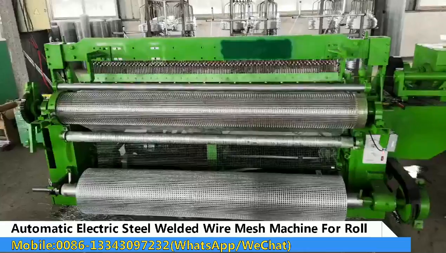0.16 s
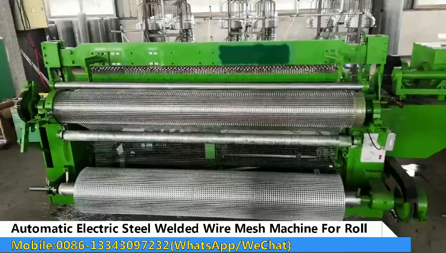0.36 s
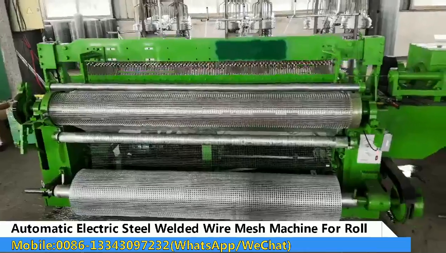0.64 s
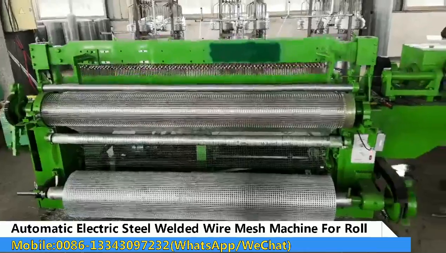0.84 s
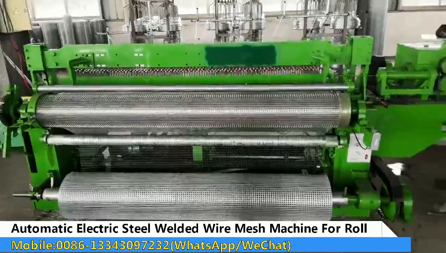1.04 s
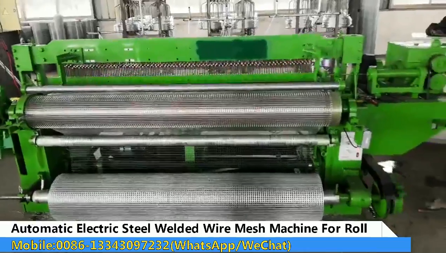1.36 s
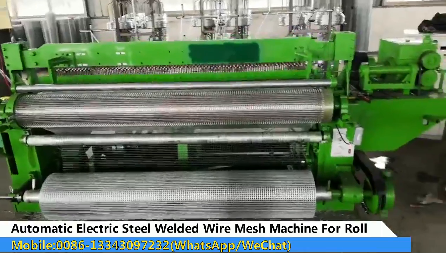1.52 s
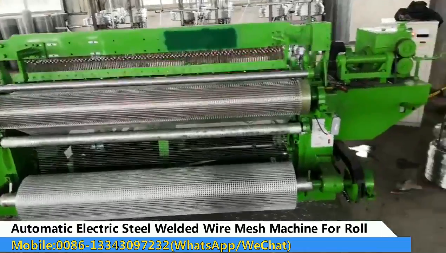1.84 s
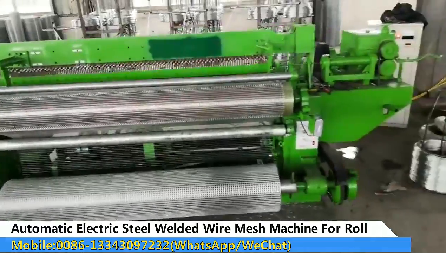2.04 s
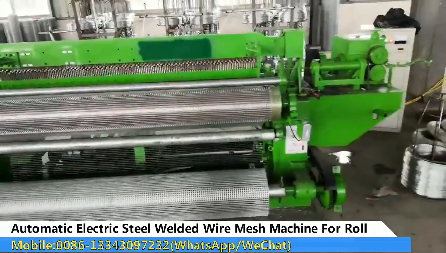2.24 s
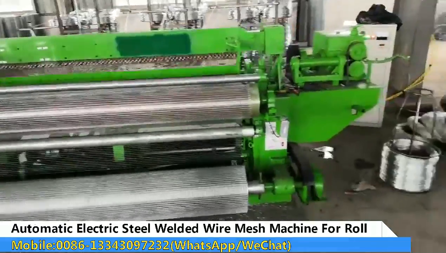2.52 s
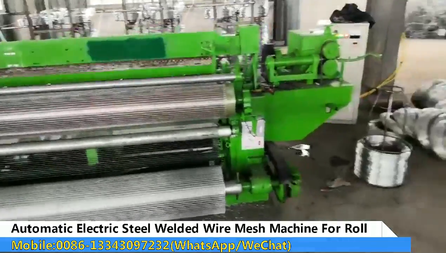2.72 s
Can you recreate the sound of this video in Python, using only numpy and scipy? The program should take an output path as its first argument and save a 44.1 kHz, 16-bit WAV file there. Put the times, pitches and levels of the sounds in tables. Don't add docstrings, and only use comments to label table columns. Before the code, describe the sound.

Heavy industrial machine cycling rhythmically, metal clacks, snaps and rattling rollers over a low factory roar

```python
import sys
import numpy as np
from scipy import signal
from scipy.io import wavfile

SR = 44100
rng = np.random.default_rng(int(sys.argv[2]) if len(sys.argv) > 2 else 0)


def invert_db(x):
    u = np.asarray(x, float) / 20
    return 10 ** u


def log_audio(samples):
    frames = np.atleast_2d(samples).T
    limited = np.clip(frames, -1, 1)
    pcm = np.round(limited * 32767).astype(np.int16)
    wavfile.write(sys.argv[1], SR, pcm)


N = 127008
STROKE_S = 0.568
SIDES = np.array([[0.5], [-0.5]])

# (time [s], level [dB])
DRIVE_EFFORT = [(.26, -19), (.6, -19), (.8, -26), (1.1, -22.5), (1.35, -25.5), (1.6, -22.5), (1.9, -24.5),
                (2.2, -23.5), (2.45, -23), (2.88, -23.5)]
# (time [s], level [dB])
DRONE_LEVEL = [(.26, -25), (.45, -29.5), (.62, -26), (.75, -33.5), (1.05, -28.5), (1.3, -31.5),
               (1.6, -33.5), (1.74, -30.5), (1.85, -31.5), (2.2, -31), (2.32, -32.5), (2.45, -34.5),
               (2.88, -31)]

# (time [s], peak [dB])
FEED_TICKS = [
    (0.3084, -26.5),
    (0.883, -24),
    (1.446, -29),
    (2.0108, -26.5),
    (2.5855, -25.5),
]
# (time [s], peak [dB], left-right [dB])
BEAM_CLACKS = [
    (0.3474, -11.5, -3.5),
    (0.9106, -16, 4.5),
    (1.484, -14.5, 1.5),
    (2.055, -12, 5),
    (2.619, -13.5, 3),
]
# (time [s], peak [dB])
LATCH_SNAPS = [
    (0.4404, -16.5),
    (1.0073, -20),
    (1.5763, -18.5),
    (2.1434, -19),
    (2.7126, -21.5),
]
# (time [s], peak [dB], left-right [dB])
PIN_PINGS = [
    (0.54, -17, 14),
    (1.107, -20, 13),
    (1.6752, -19, -0.5),
    (2.242, -23.5, -12),
    (2.816, -22, -10),
]
# (time [s], peak [dB])
RETURN_THUDS = [
    (0.6044, -32),
    (1.1744, -27),
    (1.7394, -23),
    (2.3046, -22),
    (2.868, -25),
]
# (time [s], peak [dB])
ELECTRODES = [(0.3102, -26), (0.322, -25), (0.34, -23), (0.3491, -16.5), (0.3601, -17), (0.365, -25),
              (0.3702, -32), (0.3746, -27), (0.8812, -27), (0.8879, -31), (0.8931, -30), (0.9, -27),
              (0.9082, -33), (0.9223, -23), (0.9377, -20), (0.942, -36), (1.4488, -34), (1.4748, -31),
              (1.4856, -23), (1.4895, -17), (1.4996, -18.5), (1.505, -22), (1.5121, -24), (1.5182, -32),
              (2.014, -25), (2.046, -21), (2.053, -25), (2.058, -20), (2.063, -23), (2.0698, -29),
              (2.076, -27), (2.0841, -27), (2.5872, -34), (2.6164, -25), (2.6224, -32), (2.6327, -20),
              (2.639, -23), (2.6444, -33), (2.6512, -30), (2.6562, -36)]
# (time [s], peak [dB])
SPITS = [
    (1.556, -39),
    (1.600, -48),
    (1.680, -44),
    (2.013, -39),
    (2.695, -38),
]
# (time [s], level [dB], pitch [Hz])
FRAME_KNOCKS = [(0.287, -33, 205), (0.289, -25, 1098), (0.327, -28, 153), (0.329, -26.5, 354),
                (0.344, -20.5, 1100), (0.352, -23, 2250), (0.362, -24, 2984), (0.367, -39, 179),
                (0.369, -28.5, 357), (0.429, -34, 1173), (0.446, -32, 2150), (0.454, -30.5, 230),
                (0.481, -25, 362), (0.511, -25, 1238), (0.544, -26, 1195), (0.581, -26, 1215),
                (0.589, -26, 1060), (0.596, -20.5, 352), (0.631, -22, 2420), (0.631, -26, 1860),
                (0.686, -27, 887), (0.706, -22, 2510), (0.913, -27, 2640), (0.915, -24, 1017),
                (0.94, -25, 1266), (1.05, -30, 347), (1.202, -26, 2440), (1.302, -29, 1900),
                (1.394, -23, 2465), (1.432, -24.5, 1098), (1.487, -24, 2250), (1.487, -23, 2775),
                (1.494, -25, 1173), (1.734, -22, 342), (1.823, -27, 895), (1.906, -24.5, 2440),
                (1.958, -24.5, 1827), (2.018, -21, 2562), (2.06, -22, 2760), (2.063, -34, 2993),
                (2.295, -28, 348), (2.317, -28, 215), (2.41, -23.5, 1756), (2.632, -25.5, 1173),
                (2.669, -28, 348), (2.766, -31.5, 326), (2.868, -25, 936), (2.871, -28.5, 360)]
# (time [s], level [dB], pitch [Hz])
SHORT_TAPS = [(0.541, -38, 6400), (1.109, -41, 7500), (1.252, -31, 2480), (1.253, -21, 1880),
              (1.678, -28, 6190), (1.759, -28, 1780), (2.244, -30.5, 6260), (2.34, -21.5, 2010),
              (2.472, -32, 1770), (2.529, -24, 2490), (2.818, -29, 6140), (2.279, -37, 1160),
              (1.3, -23.5, 1910), (2.014, -43, 11400), (2.014, -42, 9400)]
# (time [s], level [dB], pitch [Hz])
PAWL_CHIMES = [
    (0.905, -34, 8080),
    (1.472, -39, 8000),
    (2.036, -41, 8060),
]

# (pitch [Hz], width [Hz], level [dB])
BEAM_MODES = [(2220, 450, -4), (2780, 34, 2), (2975, 90, -0.5), (3484, 93, 1), (3690, 180, -8),
              (5205, 100, -5), (5815, 60, -3.5), (6084, 60, -7), (8020, 600, -13), (8900, 810, -11.5)]
# (pitch [Hz], width [Hz], level [dB])
PAWL_MODES = [(5760, 94, -8), (8165, 79, -13), (2560, 450, 1)]
# (pitch [Hz], width [Hz], level [dB])
LATCH_MODES = [(1240, 220, -11), (2020, 440, -12), (4450, 720, -21), (5510, 130, -1), (6080, 320, -5.5),
               (9900, 860, -10.5)]
# (pitch [Hz], width [Hz], level [dB])
PIN_MODES = [(6110, 370, -7), (2884, 110, -5), (7620, 390, -17)]
# (pitch [Hz], width [Hz], level [dB])
STOP_MODES = [(4300, 120, -3.5), (5350, 300, -9), (5600, 530, -3.5)]
# (pitch [Hz], width [Hz], level [dB])
FRAME_MODES = [(899, 31, -5.5), (1011.5, 16, -6), (1111.4, 31, -6), (1173, 31, -2), (1269, 28, -3)]
# (pitch [Hz], width [Hz], level [dB])
ROLLER_MODES = [(1770, 66, 4.5), (1883, 74, 1.5), (2034, 72, 0.5), (2360, 40, -1.5), (2453, 50, 2),
                (2473, 175, 1), (2700, 130, -3.5), (4170, 240, -13)]
# (pitch [Hz], width [Hz], level [dB])
GEARBOX_MODES = [(111.3, 4.2, -4), (152.4, 15, -7), (167.3, 8.6, 4.5), (220.3, 46, -1.5), (274, 11, -13.5),
                 (341.8, 20.7, 2.5), (432.6, 7.7, -0.5)]

# (pitch [Hz], level [dB per Hz])
ROAR_TONE = [(15, -51), (25, -21.5), (340, -3), (546, -12), (894, -4.5), (1490, -9.5), (2500, -6.5),
             (3400, -18), (4420, -36.5), (7480, -120)]
# (pitch [Hz], level [dB per Hz])
HISS_TONE = [(2700, -16), (3300, -1.5), (4700, -5), (6200, -5.5), (7000, -8.5), (8900, -14), (9700, -24.5),
             (15700, -36)]
# (pitch [Hz], level [dB per Hz])
CRACK_TONE = [(590, -39), (1000, -59), (1620, -35), (1930, 11), (3210, 8.5), (4430, 1.5), (15800, -16)]
# (pitch [Hz], level [dB per Hz])
CRUNCH_TONE = [(1000, 0), (2800, -3), (4800, -3), (6050, -13), (7000, -9.5), (11500, -29.5), (12800, -51),
               (15800, -54)]
# (pitch [Hz], level [dB per Hz])
SIZZLE_TONE = [(8000, -16), (11500, -4), (14000, 0), (15800, -4)]

# (pitch [Hz], likeness [0 to 1])
LIKENESS = [(60, .999), (130, 1), (340, 0.94), (520, 0.4), (1000, 0.45), (3000, 0.26), (15000, 0.5)]
# (pitch [Hz], left-right [dB])
LEFT_LEAN = [(300, -0.5), (700, 0.5), (1300, 2.5), (2400, 6), (4400, -5), (8100, 1.5), (15000, 7)]
# (pitch [Hz], delay [samples])
RIGHT_LAG = [(300, 3), (600, 17), (950, 1), (3000, 5), (5800, 14), (15000, 21)]


def unit(x):
    return x / np.sqrt(np.mean(x ** 2) + 1e-20)


def at(points, x, warp=np.log):
    p = np.array(points, float)
    return np.interp(warp(x), warp(p[:, 0]), p[:, 1])


def in_time(rows):
    return at(rows, np.arange(N) / SR, np.asarray)


def drift(rate):
    r = np.exp(-80 * np.pi * rate / SR)
    chance = rng.standard_normal(N // 40 + 2002)
    slow = signal.lfilter([1], [1, -2 * r, r * r], chance)[2000:]
    return np.interp(np.arange(N) / 40, np.arange(len(slow)), unit(slow))


def swell(peak_s, height_db):
    return height_db * np.cos(2 * np.pi * (np.arange(N) / SR - peak_s) / STROKE_S)


def ports(mid, side, hz):
    alike = np.clip(at(LIKENESS, hz), 0, 0.999)
    shared, differing = np.sqrt(1 + alike) * mid, np.sqrt(1 - alike) * side
    left, right = (shared + differing * [[1], [-1]]) / np.sqrt(2)
    return invert_db(at(LEFT_LEAN, hz) * SIDES) * [left, np.roll(right, int(at(RIGHT_LAG, hz)))]


def resonate(x, hz, width_hz):
    for wide in (1, 5):
        r = np.exp(-np.pi * wide * max(width_hz, 2) / SR)
        gain = np.sqrt((1 - r * r) / 2) if wide == 1 else (1 - r * r) / 2
        poles = [1, -2 * r * np.cos(2 * np.pi * hz / SR), r * r]
        x = signal.lfilter(gain * np.array([1, 0, -1]), poles, x + 1e-18)
    return x


def coloured(tone, patchy_db=0, count=2.5):
    low_hz, top_hz = max(tone[0][0], 20), min(tone[-1][0] * 1.1, 18000)
    edges = np.geomspace(low_hz, top_hz, int(count * np.log2(top_hz / low_hz)))
    out, white = 0, rng.standard_normal((2, 2, N))
    for k, (low, high) in enumerate(zip(edges, edges[1:])):
        hz = np.sqrt(low * high)
        band_filter = signal.butter(3, [low, high], "band", fs=SR, output="sos")
        band = signal.sosfilt(band_filter, white[k % 2])
        level_db = at(tone, hz) + patchy_db * drift(9.7)
        out = out + invert_db(level_db) * ports(*band, hz)
    return unit(out)


def hall(x):
    ring_out_s, wall_hz = 0.83, 4260
    out, dull = np.zeros((2, N)), np.exp(-2 * np.pi * wall_hz / SR)
    for k, lag in enumerate((rng.uniform(0.027, 0.07, 12) * SR).astype(int)):
        loop, gain, state = x.copy(), invert_db(-60 * lag / SR / ring_out_s), [0.]
        for i in range(lag, N, lag):
            back, state = signal.lfilter([gain * (1 - dull)], [1, -dull], loop[i - lag:i], zi=state)
            loop[i:i + lag] += back[:N - i]
        out[k % 2] += (loop - x) * (-1) ** (k // 2)
    return out


def roar_and_hiss(load):
    swing = load - load.mean()
    roar = invert_db(-24 + 0.61 * swing) * coloured(ROAR_TONE, patchy_db=2.0, count=3)
    hiss_db = -35 + 0.55 * swing + swell(0.4, 1.5)
    return roar + invert_db(hiss_db) * coloured(HISS_TONE, patchy_db=-1.3, count=6)


def body(modes, hits_per_s, spread_db, flicker_db, flicker_rate):
    strength = invert_db(spread_db * np.minimum(rng.exponential(1, N), 3))
    hits = (rng.random(N) < hits_per_s / SR) * strength
    out, white = 0, rng.standard_normal((2, N)) * (0.25 + unit(hits))
    for k, (hz, width_hz, db) in enumerate(modes):
        own_noise = np.roll(white, k * N // len(modes), axis=1)
        force = ports(*own_noise, hz) * invert_db(flicker_db * drift(flicker_rate))
        out = out + invert_db(db) * np.sqrt(width_hz) * resonate(force, hz, width_hz)
    return unit(out)


def gears():
    return invert_db(in_time(DRONE_LEVEL) - 2.0) * body(GEARBOX_MODES, 300, 2.5, 1.6, 2.3)


def rattle(load):
    frame = invert_db(load - 7.5 + swell(0.25, 1)) * body(FRAME_MODES, 400, 1.9, 2.6, 8.1)
    rollers = invert_db(load - 5.5 + swell(0.766, 3.85)) * body(ROLLER_MODES, 400, 3.1, 1.4, 7.1)
    return frame + rollers


def ring(rows, rise_s, fall_s, level_db, wobble):
    out, waver = np.zeros((2, N)), np.array([drift(41), drift(42)])
    phases = rng.uniform(0, 2 * np.pi, (len(rows), 2))
    for (s, db, hz), phase in zip(rows, phases):
        slow = (1000 / hz) ** 0.15
        rise, fall = rise_s * slow, fall_s * slow
        i = slice(int((s - 5 * rise) * SR), int((s + 7 * fall) * SR))
        u = np.arange(N)[i] / SR - s
        shape = np.where(u < 0, np.exp(-(u / rise) ** 2), np.exp(-np.abs(u) / fall))
        unlike = (1 - np.clip(at(LIKENESS, hz), 0, 1)) * np.array([[0], [phase[1] - np.pi]])
        tone = np.sin(2 * np.pi * hz * u + phase[0] + unlike + wobble * waver[:, i])
        out[:, i] += invert_db(db + level_db + at(LEFT_LEAN, hz) * SIDES) * shape * tone
    return out


def knocks():
    return (ring(FRAME_KNOCKS + PAWL_CHIMES, 0.0082, 0.014, 5.14, 0.43)
            + ring(SHORT_TAPS, 0.0022, 0.0074, 4.9, 0.24))


PEAK_LATE_S = 0.0024


def burst(rows, rise_s, fall_s, db):
    t, out = np.arange(N) / SR, np.zeros((2, N))
    for row, extra_db in zip(rows, db):
        i = slice(max(int((row[0] - 6 * rise_s) * SR), 0), int((row[0] + 8 * fall_s) * SR))
        u = t[i] - row[0] - PEAK_LATE_S
        pan_db = row[2] if len(row) == 3 else 0
        shape = np.exp(np.minimum(u / rise_s, -u / fall_s))
        out[:, i] += shape * invert_db(row[1] + extra_db + pan_db * SIDES)
    return out


def contact(rows, modes, rise_s, fall_s, ring_db, noise, crack_db, crack_s, vary_db=1.2):
    ragged = invert_db(1.5 * np.clip(drift(350), -2, 1.5))
    out = invert_db(crack_db) * burst(rows, rise_s, crack_s, np.zeros(len(rows))) * noise * ragged
    white = rng.standard_normal((2, N)) * ragged
    for hz, width_hz, db in modes:
        uneven_db = vary_db * rng.standard_normal(len(rows))
        force = burst(rows, rise_s, fall_s, uneven_db) * ports(*white, hz)
        out += invert_db(ring_db + db) * resonate(force, hz, width_hz)
    return out


def stroke():
    crack, crunch = coloured(CRACK_TONE), coloured(CRUNCH_TONE)
    electrodes = [(s - PEAK_LATE_S, db) for s, db in ELECTRODES]
    bounces = [(s + 0.022, db - 8.5, pan) for s, db, pan in BEAM_CLACKS]
    clacks = BEAM_CLACKS + bounces
    return (contact(FEED_TICKS, PAWL_MODES, 0.0053, 0.056, -0.65, crunch, -5, 0.0086)
            + contact(electrodes, BEAM_MODES, 0.00049, 0.002, -2.4, crunch, -4.0, 0.002, vary_db=3.5)
            + contact(SPITS, [], 0.002, 0.01, 0, coloured(SIZZLE_TONE), -0.5, 0.01)
            + contact(clacks, BEAM_MODES, 0.01, 0.011, -10, crunch, -11, 0.0092)
            + contact(LATCH_SNAPS, LATCH_MODES, 0.0028, 0.01, -9, crack, 0.35, 0.012)
            + contact(PIN_PINGS, PIN_MODES, 0.0015, 0.0068, -4.5, crunch, -19, 0.004)
            + contact(RETURN_THUDS, STOP_MODES, 0.009, 0.059, -8.5, crunch, -6.5, 0.082))


def scene():
    load = in_time(DRIVE_EFFORT)
    hits = stroke() + knocks()
    echoes = invert_db(-20) * hall(hits[0] + hits[1])
    return roar_and_hiss(load) + gears() + rattle(load) + echoes + hits


def band_limit(x):
    return signal.sosfilt(signal.butter(12, 15910, fs=SR, output="sos"), x)


def record(dry):
    start_s, open_s, top = 0.2495, 0.0015, 0.9
    opening = np.clip((np.arange(N) / SR - start_s) / open_s, 0, 1)
    mix = top * np.tanh(dry / top) * opening
    return band_limit(mix)


dry = scene()
out = record(dry)
log_audio(out)
```